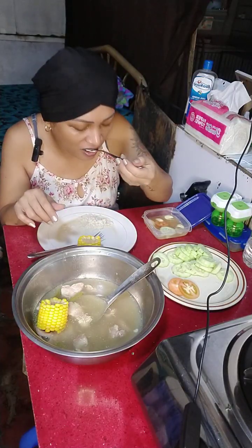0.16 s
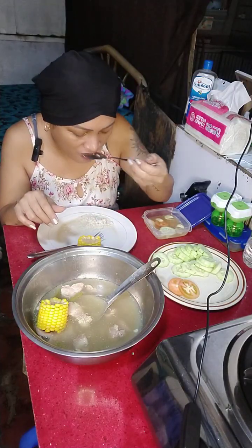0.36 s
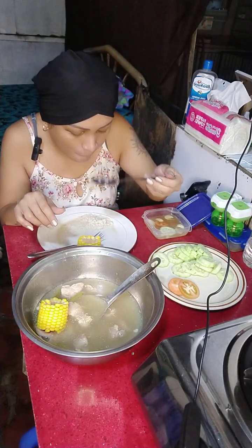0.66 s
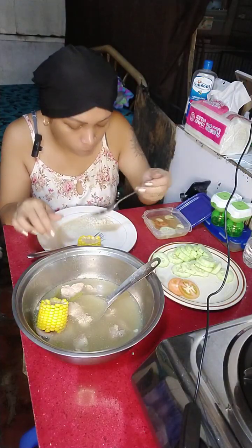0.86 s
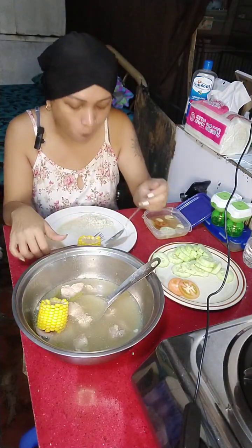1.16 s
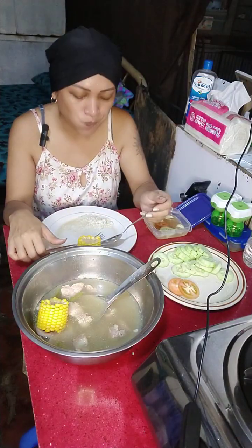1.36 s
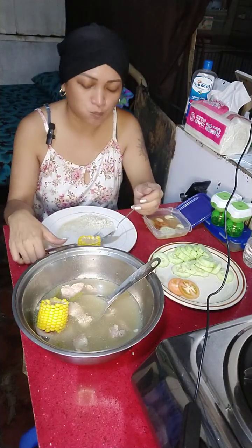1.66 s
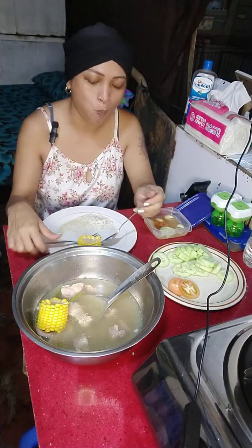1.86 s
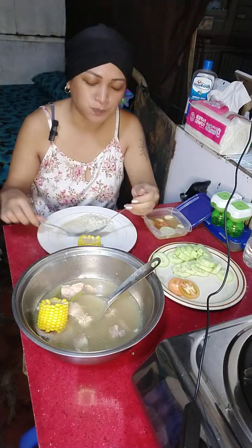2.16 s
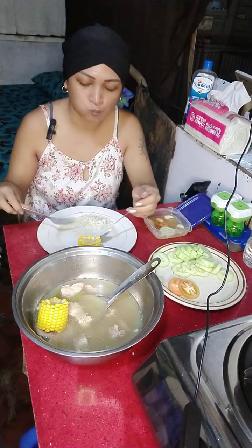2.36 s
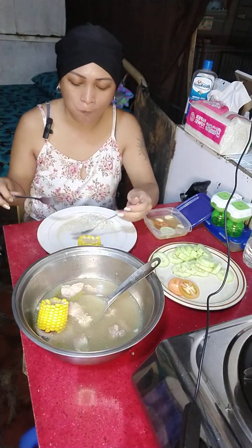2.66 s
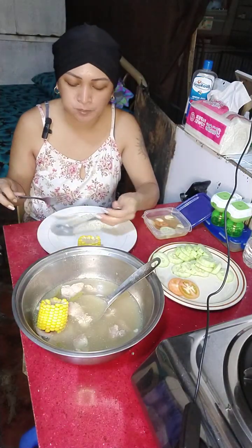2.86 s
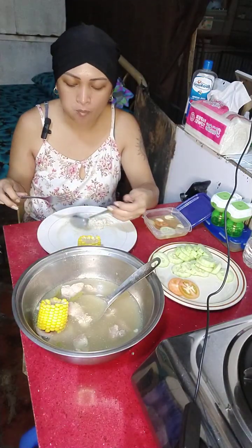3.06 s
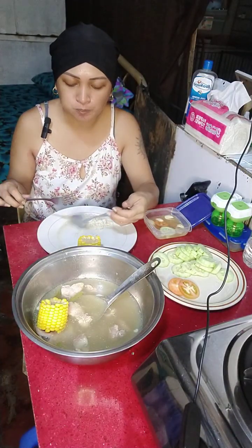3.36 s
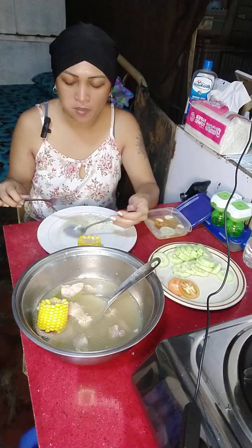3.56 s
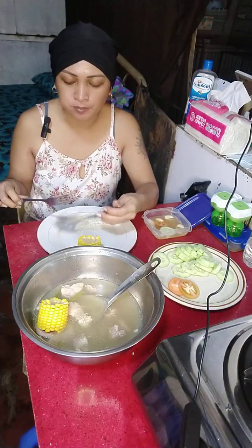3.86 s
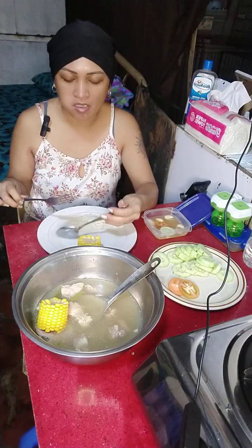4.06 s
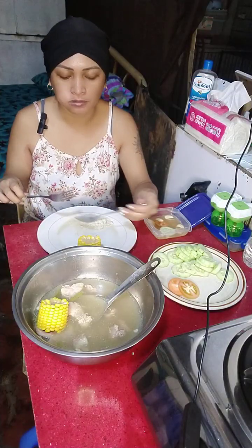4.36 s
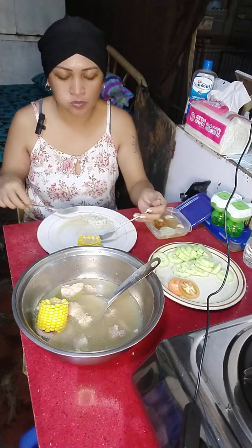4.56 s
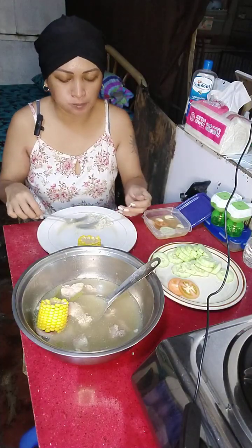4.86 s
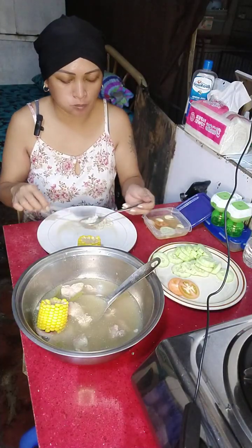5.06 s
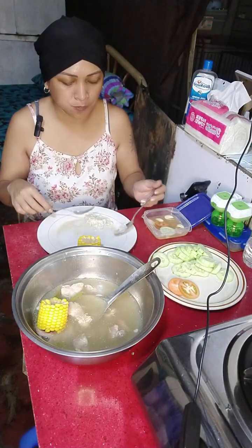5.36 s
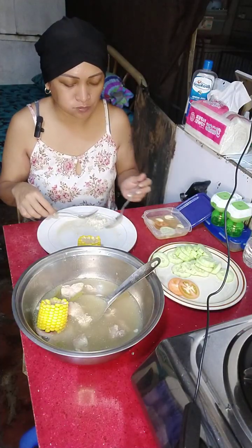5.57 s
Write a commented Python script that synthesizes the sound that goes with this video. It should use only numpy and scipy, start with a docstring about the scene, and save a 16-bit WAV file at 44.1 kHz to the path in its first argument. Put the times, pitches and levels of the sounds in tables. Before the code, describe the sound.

A metal spoon and fork clink, graze and faintly scrape on a ceramic plate, with quiet gaps over a steady soft hiss.

```python
"""Steady hiss and a briefly swelling faint hum come first, then a dull tap; a spoon and fork follow on a plate.
At a table in a small furnished room, metal knocks, glances, grazes and scrapes on the ceramic.
Each touch sends noisy slips and one firm impulse through the same damped modes and a denser clatter.
A close mono microphone fades weak tails and adds the hiss; a limiter, clipper and treble cut follow."""
import sys
import numpy as np
from scipy import signal
from scipy.fft import rfft, irfft
from scipy.io import wavfile

SR = 44100
rng = np.random.default_rng(int(sys.argv[2]) if len(sys.argv) > 2 else 0)


def file_out(sig):
    """Save sig as 16-bit WAV at sys.argv[1]."""
    # one column per channel
    cols = np.atleast_2d(sig).T
    # limit, then scale
    lim = np.clip(cols, -1, 1)
    pcm = np.round(lim * 32767).astype(np.int16)
    wavfile.write(sys.argv[1], SR, pcm)


N = 252693

# Ranges of pitch that a touch excites more or less strongly. Each entry: one edge in Hz, low to high.
REGISTERS = [320, 720, 1150, 1700, 2550, 2950, 4100, 4900, 9000]


def amp(db):
    """Turns decibels into gain."""
    return 10 ** (np.asarray(db) / 20)


def unit(x):
    """Scales a sound to energy 1."""
    return x / np.sqrt(np.sum(x ** 2) + 1e-20)


def read(points, hz):
    """Reads a table of values over log frequency."""
    point_hz, value = np.transpose(points)
    return np.interp(np.log(hz + 1), np.log(point_hz + 1), value)


def add(mix, start_s, sound):
    """Mixes a sound in at its start time, cut off at the end of the scene."""
    part = mix[round(start_s * SR):][:len(sound)]
    part += sound[:len(part)]


def cutlery(bass_hz=320, slip_count=4):
    """Metal touches the plate again and again; so small a plate radiates little bass."""
    # Square knocks. Each row: start in seconds, level in dB, skid before full contact in seconds,
    # ring length factor, favoured mode in Hz, rise of that mode's register in dB.
    knock_rows = [(3.2941, -16, 0.00029, 0.68, 3604, 4.5), (3.901, -35, .003, 0.47, 2430, 0.5),
                  (4.1457, -20.5, 0.0096, 0.76, 2430, 0), (4.704, -21, 0.0015, 1, 6195, 3)]
    # Blows of an edge that slides on. Each row: start in seconds, level in dB, skid in seconds,
    # drag after contact in seconds, ring length factor, favoured mode in Hz, rise of its register in dB,
    # centre of the range that stands out in Hz, its rise in dB, change of the lowest register in dB.
    glance_rows = [(1.6347, -29, 0.0037, 0.0046, 0.66, 3543, 10.5, 1400, 1.5, -10),
                   (1.716, -32.5, .002, 0.0044, 0.44, 3543, 9, 1130, 4.5, -45),
                   (1.725, -21.5, .0055, 0.0077, 0.19, 1300, 1.5, 3100, 15.5, -50),
                   (1.74, -33, 0.0053, 0.0031, 0.27, 7080, 6.5, 3500, 11.5, -35),
                   (1.7763, -36, 0.00083, 0.0079, 0.33, 4627, 2.5, 2100, 4.5, -40),
                   (2.007, -50.5, .003, 0.0037, 0.28, 1300, 9, 4500, 7, -20),
                   (3.798, -39.5, .003, 0.0056, 0.39, 1230, 7, 900, 7, -30),
                   (3.804, -29.5, .0035, 0.0055, 0.57, 1230, 5, 2800, 11, -45),
                   (5.441, -28, 0.00124, 0.0037, 0.43, 2662, 9.5, 1090, 21, -17)]
    # Light grazes and rebounds. Each row: start in seconds, level in dB, skid in seconds,
    # favoured mode in Hz, rise of that mode's register in dB.
    graze_rows = [(1.922, -44, .003, 2150, -2.5), (2.426, -50, .0015, 2217, -1.5),
                  (2.858, -43, .0026, 2217, -1.5), (2.959, -47.5, .002, 1047, 7.5),
                  (3.0135, -28, 0.0097, 3543, 9), (3.061, -32.5, .005, 3604, 2.5),
                  (3.412, -50, .014, 2217, 5), (4.19, -39.5, 0.00204, 3915, 3.5),
                  (4.293, -49.5, .006, 2217, 7), (4.318, -41.5, .006, 3543, 5),
                  (4.743, -34.5, .004, 1385, 6), (4.775, -57, .006, 3415, 18), (4.812, -55, .006, 3415, 14),
                  (4.867, -49, .0063, 2217, -2.5), (5.475, -43.5, 0.0054, 1885, 6),
                  (5.478, -55, .008, 2662, 22)]
    mix = np.zeros(N)
    for play, rows in (knock, knock_rows), (glance, glance_rows), (graze, graze_rows):
        for start_s, *settings in rows:
            add(mix, start_s, play(*settings))

    # a short faint scrape: the metal catches and slips at an even pace, each time weaker
    scrape_s, slip_every_s = 2.063, .016
    scrape_db, fade_db_per_slip = -50, -1.16
    for k in range(slip_count):
        add(mix, scrape_s + k * slip_every_s, slip(scrape_db + k * fade_db_per_slip))
    return signal.sosfilt(signal.butter(2, bass_hz, "highpass", fs=SR, output="sos"), mix)


def knock(db, skid_s, length, favoured_hz, lift_db):
    """Metal lands square and stops at once: the whole plate rings, and the clatter is a short crack."""
    # Colour of a square knock. Each entry: level in dB of one register, low to high.
    knock_colour = [-15.5, -11.5, -4.5, 1, -4.5, -3, -10, -11.5]
    drag_s = 0.00093
    return touch(db + np.array(knock_colour), skid_s, drag_s, length, favoured_hz, lift_db,
                 clatter_db=-8.5, clatter_t60_s=0.028)


def glance(db, skid_s, drag_s, length, favoured_hz, lift_db, peak_hz, peak_db, thud_db):
    """An edge slides over the glaze: thinner than a knock, with one range of pitch standing out."""
    # Colour of a glancing blow. Each entry: level in dB of one register, low to high.
    glance_colour = [0, -15.5, -9, -7.5, -7.5, -4.5, -6, -12]
    peak_width_hz = 280
    centres_hz = np.sqrt(np.multiply(REGISTERS[:-1], REGISTERS[1:]))
    peak = np.exp(-.5 * ((centres_hz - peak_hz) / peak_width_hz) ** 2)
    levels_db = db + np.array(glance_colour) + peak_db * peak
    levels_db[0] += thud_db
    return touch(levels_db, skid_s, drag_s, length, favoured_hz, lift_db, clatter_db=-5)


def graze(db, skid_s, favoured_hz, lift_db):
    """A light touch: the gentler it lands, the purer it rings, and the lighter, the longer."""
    # Colour of a graze. Each entry: level in dB of one register, low to high.
    graze_colour = [-28, -18.5, -18, -5, -10.5, -6.5, -20.5, -16]
    gentle_s = 0.0034  # at this skid or slower the colour is full; quicker landings flatten it
    drag_s = 0.0031
    # the length factor is .85 at -44 dB; a firmer touch damps the ring
    length = .85 * amp(0.19 * (-44 - db))
    levels_db = db + np.array(graze_colour) * min(skid_s / gentle_s, 1)
    return touch(levels_db, skid_s, drag_s, length, favoured_hz, lift_db, clatter_db=-5.5)


def slip(db):
    """The scraping metal lets go once and drags on into the next slip."""
    # Colour of the scrape. Each entry: level in dB of one register, low to high.
    scrape_colour = [0, -2, -2, 0.5, -13, 0.5, -2.5, -16]
    return touch(db + np.array(scrape_colour), skid_s=.002, drag_s=0.014, length=.4,
                 favoured_hz=4390, lift_db=4, clatter_db=5)


def touch(levels_db, skid_s, drag_s, length, favoured_hz, lift_db, clatter_db, clatter_t60_s=0.11):
    """The spot touched lifts the register of one mode; an abrupt landing adds clatter."""
    edges_hz = np.array(REGISTERS)
    favoured = (edges_hz[:-1] <= favoured_hz) & (favoured_hz < edges_hz[1:])
    # the given clatter level holds for a skid of 1 ms
    clatter_db_per_doubling = -1.5
    clatter_db = clatter_db + clatter_db_per_doubling * np.log2(skid_s / .001)
    # the favoured mode stands out within its register, the more so when that is lifted
    favoured_db = 7.5 + 0.75 * lift_db
    return clink(skid_s, drag_s, length, clatter_db, favoured_hz, levels_db + lift_db * favoured,
                 favoured_db, clatter_t60_s)


def clink(skid_s, drag_s, length, clatter_db, favoured_hz, levels_db, favoured_db, clatter_t60_s,
          stick_per_s=700, clatter_db_per_octave=4, clatter_top_hz=5800, tick_db=-19.5):
    """A contact force gives a bright tick, rings the modes and stirs a clatter of dense, damped ones."""
    # Modes of the plate and the cutlery on it. Each row: frequency in Hz, relative level in dB,
    # decay by 60 dB in seconds before the ring length factor.
    mode_rows = [(436, 0, .09), (880, -8, .04), (998, 0, .06), (1047, -2, .06), (1230, -9, .07),
                 (1300, -11, .07), (1385, 0, .15), (1885, -19, .14), (2150, -10, .11), (2215, 0, .125),
                 (2430, -8, .1), (2485, -11, .11), (2630, -9, .13), (2662, 0, .11), (3040, -7, .1),
                 (3115, -10, .1), (3178, -10, .12), (3270, -11, .1), (3415, -6, .11), (3543, 0, .12),
                 (3604, -2, .16), (3690, -11, .08), (3790, -12, .07), (3915, -8, .16), (4300, -11, .12),
                 (4390, -7, .09), (4447, 0, .11), (4627, -2, .16), (5350, -10, .12), (5457, -6, .18),
                 (5672, -7, .17), (5795, -7, .12), (6195, 0, .16), (6312, -9, .18), (7085, -15, .14),
                 (8300, -14, .1), (8549, -12, .11)]
    t = np.arange(SR // 4) / SR
    press, force = contact(t, skid_s, drag_s, length)
    sound = amp(max(levels_db) + clatter_db + tick_db) * unit(np.diff(force, prepend=0))

    # the struck spot lies on the antinode of the mode nearest to favoured_hz
    antinode_hz = min((hz for hz, _, _ in mode_rows), key=lambda hz: abs(hz - favoured_hz))
    dull = signal.butter(2, clatter_top_hz, fs=SR, output="sos")
    for low, high, level_db in zip(REGISTERS, REGISTERS[1:], levels_db):
        ring = np.zeros(len(t))
        for hz, db, t60_s in mode_rows:
            if low <= hz < high:
                decay = amp(-60 * t / (t60_s * length))
                mode = np.sin(2 * np.pi * (hz * t + rng.random())) * decay
                # stick-slip locks to the mode
                squeak = stick_per_s / SR * press * np.cos(2 * np.pi * hz * (t - skid_s))
                rung = signal.fftconvolve(force + squeak, mode)[:len(t)]
                ring += amp(favoured_db if hz == antinode_hz else db) * unit(rung)

        # decaying noise stands for the dense modes
        dense_decay = amp(-60 * t / (clatter_t60_s * length))
        dense = signal.sosfilt(dull, rng.standard_normal(len(t)) * dense_decay)
        band = signal.butter(N=3, Wn=[low, high], btype="bandpass", fs=SR, output="sos")
        clatter = unit(signal.sosfilt(band, signal.fftconvolve(force, dense)[:len(t)]))
        # modes crowd towards the treble
        clatter *= amp(clatter_db + clatter_db_per_octave * np.log2(low / 2000))
        sound += amp(level_db) * unit(signal.sosfilt(band, unit(ring) + clatter))
    return sound * np.sqrt(.02 * SR)  # unit energy becomes unit RMS over 20 ms


def contact(t, skid_s, drag_s, length, chatter_per_s=3200, firm=0.27, buzz_db=-23, buzz_s=0.041):
    """Metal slips on the glaze ever harder, lands, drags to rest and buzzes on: gives pressure and force."""
    slips = rng.standard_normal(len(t)) * (rng.random(len(t)) < chatter_per_s / SR)
    landing = np.minimum(t / skid_s, 1)
    after = np.maximum(t - skid_s, 0)
    press = landing * np.exp(-after / drag_s)
    # the ringing plate rattles against the metal
    buzz = amp(buzz_db) * landing * np.exp(-after / (buzz_s * length))
    force = unit(slips * (press + buzz))
    force[round(skid_s * SR)] += firm
    return press, force


def taps(onset_s=0.0019):
    """Food and hands make soft contacts: one damped resonance each, with a blunt start."""
    # Dull little taps. Each row: start in seconds, level in dB, frequency in Hz, decay by 60 dB in seconds.
    tap_rows = [(.345, -47.5, 613, 0.031), (3.088, -44.5, 570, 0.032), (5.585, -44.5, 930, 0.11),
                (5.593, -45, 686, 0.039)]
    mix, t = np.zeros(N), np.arange(SR // 8) / SR
    for start_s, db, hz, t60_s in tap_rows:
        shape = (1 - np.exp(-t / onset_s)) ** 2 * amp(-60 * t / t60_s)
        add(mix, start_s, amp(db) * shape / shape.max() * np.sin(2 * np.pi * hz * t))
    return mix


def room(x):
    """The room returns a weak diffuse tail of noise that builds up and dies band by band."""
    # Reverberation. Each row: frequency in Hz, decay by 60 dB in seconds.
    room_decay = [(300, 0.58), (1200, 0.21), (2300, 0.39), (3600, 0.34), (8000, 0.042)]
    wet_db, build_s = -27, .008
    hz, t, z = signal.stft(rng.standard_normal(SR // 2), SR, nperseg=256)
    decay = amp(-60 * t / read(room_decay, hz)[:, None])
    build_up = 1 - np.exp(-t / build_s)
    tail = signal.istft(z * decay * build_up, SR, nperseg=256)[1]
    return amp(wet_db) * signal.fftconvolve(x, unit(tail))[:N]


def suppress(x, threshold_db=-62, size=512):
    """The microphone's noise suppressor fades each weak partial, so the rings end early."""
    overlap = size * 3 // 4
    z = signal.stft(x, SR, nperseg=size, noverlap=overlap)[2]
    power = abs(z) ** 2
    kept = z * power / (power + amp(threshold_db) ** 2)
    return signal.istft(kept, SR, nperseg=size, noverlap=overlap)[1][:N]


def hiss(level_db=-44, rumble_cut_hz=49):
    """Electronics give steady coloured noise, brightest at the top, with the lowest bass cut."""
    # Colour of the hiss. Each row: frequency in Hz, relative density in dB per Hz.
    hiss_colour = [(26, -51), (45, -5), (85, -6.5), (200, -6.5), (237, -7), (326, -8.5), (572, -7),
                   (631, -8), (748, -7.5), (1410, -8.5), (2600, -8), (5550, -5.5), (11600, -1.5),
                   (15500, -0.5)]
    hz = np.fft.rfftfreq(N, 1 / SR)
    rumble_cut = hz ** 2 / np.hypot(hz ** 2, rumble_cut_hz ** 2)
    colour = amp(read(hiss_colour, hz)) * rumble_cut
    noise = irfft(rfft(rng.standard_normal(N)) * colour, N)
    return amp(level_db) * np.sqrt(N) * unit(noise)


def hum(hum_hz=52.6):
    """One faint low sine tone swells briefly."""
    # Course of the hum. Each row: time in seconds, RMS level in dB.
    hum_course = [(0, -79), (.14, -73), (.19, -67), (.43, -68), (.56, -88)]
    t = np.arange(N) / SR
    level_db = np.interp(t, *np.transpose(hum_course))
    return np.sqrt(2) * amp(level_db) * np.sin(2 * np.pi * hum_hz * t)


def scene():
    """Plate, taps and room reach one microphone; hiss and hum join after its suppressor, alike in both channels."""
    table = cutlery() + taps()
    mono = suppress(table + room(table)) + hiss() + hum()
    return np.array([mono, mono])


def record(dry, limit_db=-11, recover_db_per_s=6, ceiling=.76, edge_hz=15680):
    """A limiter falls quickly and recovers slowly, peaks clip at the ceiling, then the top treble is cut."""
    # power smoothed over about 128 samples
    power = signal.lfilter([1 / 128], [1, 1 / 128 - 1], dry[0] ** 2)
    power_db = 10 * np.log10(power + 1e-12)
    # the held peak sinks at the recovery rate
    fall_db = np.arange(N) * recover_db_per_s / SR
    held_db = np.maximum.accumulate(power_db + fall_db) - fall_db
    over_db = np.maximum(held_db - limit_db, 0)
    limited = np.clip(dry * amp(-over_db), -ceiling, ceiling)
    band_limit = signal.firwin(1023, edge_hz, window=("kaiser", 9), fs=SR)
    return signal.oaconvolve(limited, band_limit[None], "same")


dry = scene()
out = record(dry)
file_out(out)
```